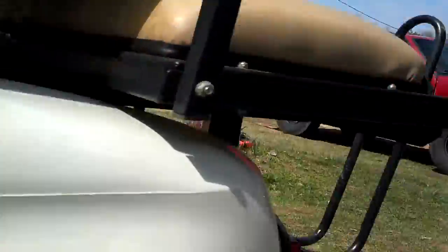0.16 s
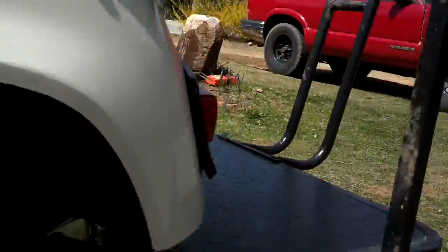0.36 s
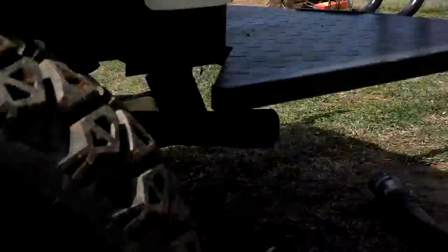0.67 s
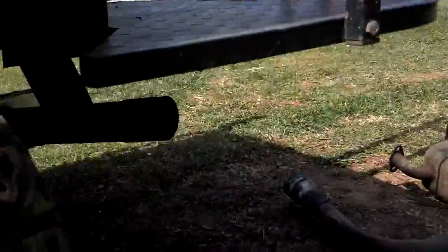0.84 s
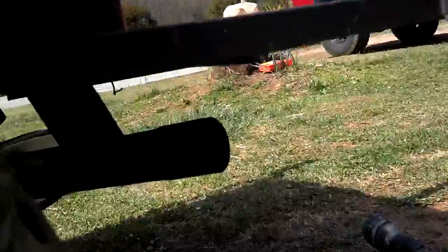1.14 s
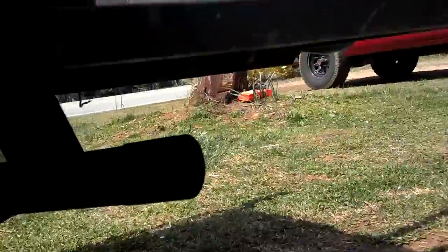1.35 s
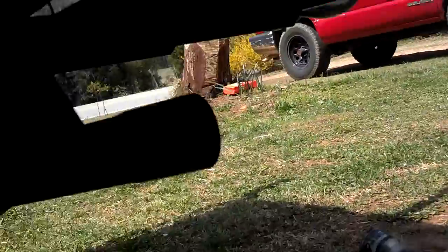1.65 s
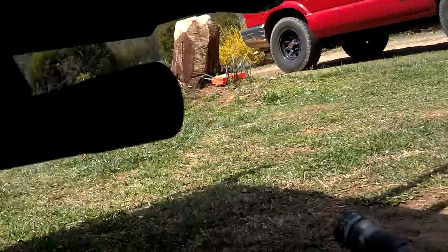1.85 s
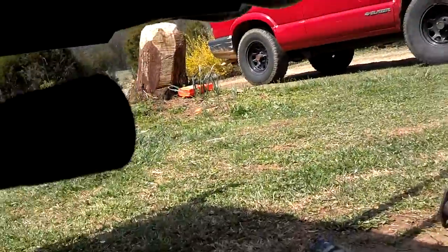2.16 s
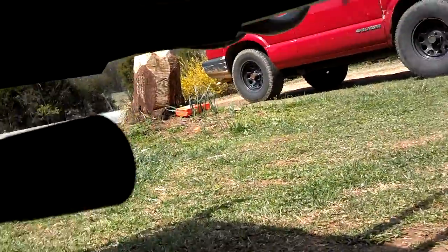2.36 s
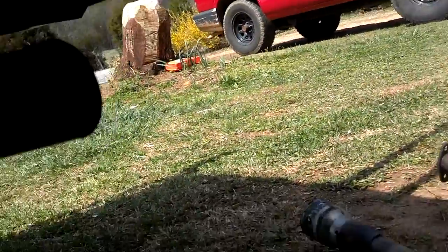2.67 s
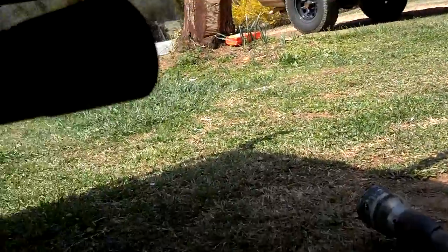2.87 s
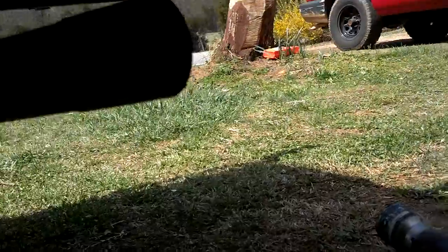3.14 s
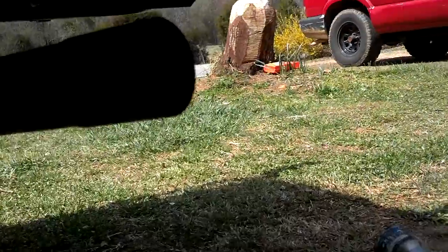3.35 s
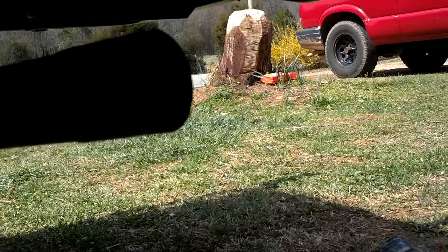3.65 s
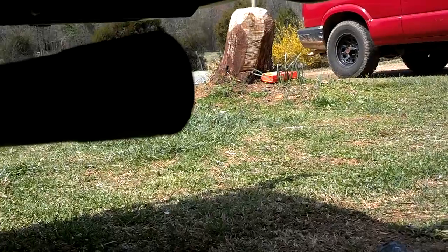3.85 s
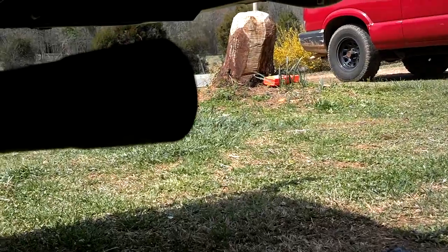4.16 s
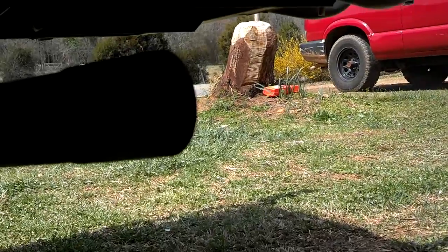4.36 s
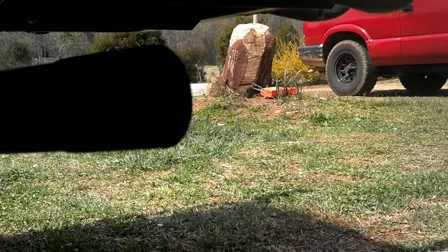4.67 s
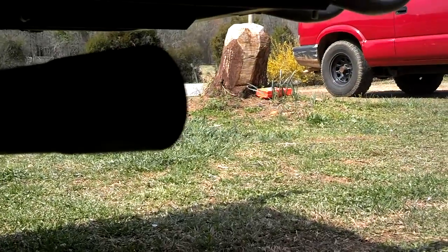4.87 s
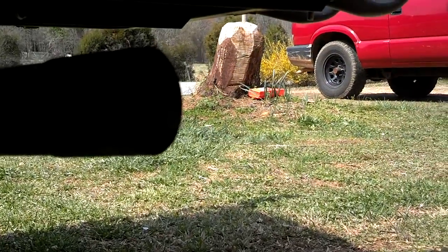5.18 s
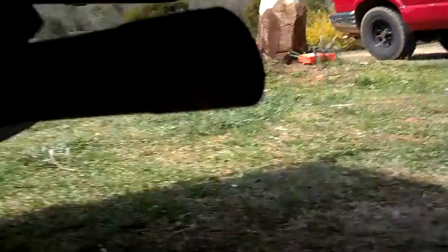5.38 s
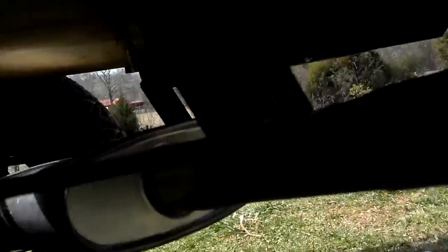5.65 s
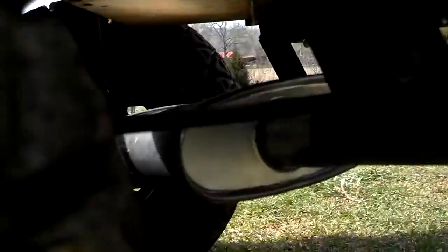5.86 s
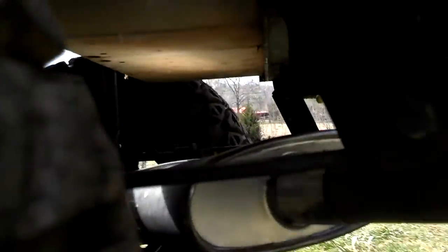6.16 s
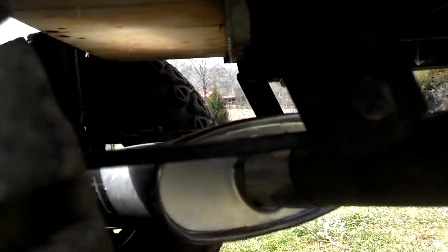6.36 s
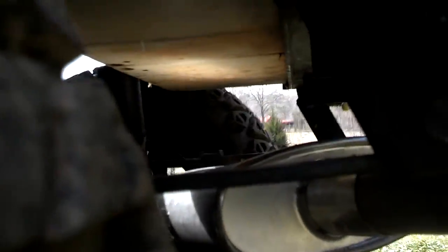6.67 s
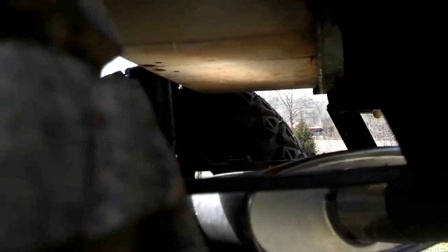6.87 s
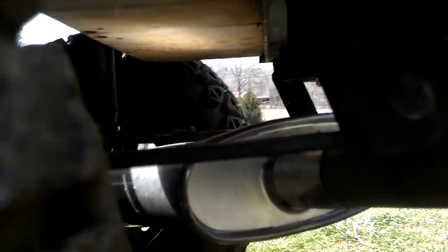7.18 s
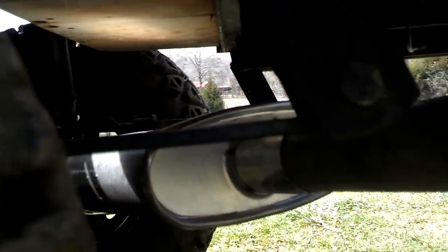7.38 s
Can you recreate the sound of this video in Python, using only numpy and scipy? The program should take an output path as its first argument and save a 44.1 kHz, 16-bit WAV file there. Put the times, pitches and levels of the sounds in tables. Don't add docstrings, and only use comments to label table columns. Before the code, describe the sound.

A small two-cylinder petrol engine idles in lumpy, uneven pops through an open exhaust outdoors, then is revved three times with raspy barks and burbling coast-downs.

```python
import sys
import numpy as np
from scipy import signal
from scipy.fft import rfft, irfft, next_fast_len
from scipy.io import wavfile
from scipy.ndimage import uniform_filter1d

SR = 44100
rng = np.random.default_rng(int(sys.argv[2]) if len(sys.argv) > 2 else 0)


def output_pcm(signal):
    pcm = np.clip(np.atleast_2d(signal).T, -1, 1) * 32767
    wavfile.write(sys.argv[1], SR, np.round(pcm).astype(np.int16))


def magnitude_from_level(level_db):
    exponent = np.asarray(level_db, float) / 20
    return 10 ** exponent


N = 331632
TIME_S = np.arange(N) / SR

# start in seconds, end in seconds.
THROTTLE_OPEN = [
    (2.875, 3.465),
    (4.08, 4.71),
    (6.291, 6.955),
]
# start in seconds, end in seconds.
AFTERBURN = [
    (4.71, 5.5),
    (6.955, 7.6),
]
MISFIRES = [114]
# time in seconds, speed in cycles per second.
SPEED = [(2.375, 15.06), (2.89, 11.86), (3.19, 20.95), (3.46, 26.37), (4.08, 20.25), (4.55, 33.19),
         (4.69, 36.2), (5.21, 28.83), (5.64, 24.09), (6.3, 18.51), (6.76, 29.76), (6.93, 31.83),
         (7.625, 26.17)]
# start in seconds, first effort in dB, last effort in dB, thump in dB, hiss over effort in dB.
STAGES = [
    (2.43, -34.5, -28, -24, -6),
    (2.875, -23, -15, -20.5, -4),
    (3.49, -25.5, -23.5, -18, -5),
    (4.08, -14.5, -12, -17.5, -8),
    (4.71, -16.5, -21, -16, -2),
    (5.51, -22, -22.5, -17.5, -7),
    (6.291, -17.5, -16.5, -18.5, -7),
    (6.97, -21, -22.5, -18.5, -3.5),
]
# time
# in seconds, strength in dB, thump in dB, sharpness from 0 to 1.
CAUGHT = [(0.0, -16, -47, .2), (0.037, -15.5, -54, 0.48), (0.089, -15.5, -41, 0.5),
          (0.317, -16, -38.5, 0.45), (0.43, -18, -40, 0.56), (0.496, -11.5, -44, 0.49),
          (0.771, -14.5, -40, 0.45), (0.834, -16.5, -41, 0.48), (0.999, -10, -40, 0.4),
          (1.06, -11.5, -46, 0.45), (1.115, -16, -36, .59), (1.171, -12.5, -41, 0.39),
          (1.417, -13.5, -42, 0.51), (1.472, -12.5, -35, 0.56), (1.53, -16.5, -41, 0.41),
          (1.661, -15, -41, 0.38), (1.725, -15.5, -39.5, 0.7), (1.838, -16, -38, 0.51),
          (1.894, -16.5, -39, 0.48), (2.008, -21.5, -34, 0.82), (2.069, -11, -35, 0.62),
          (2.15, -13, -32, 0.65), (2.191, -11.5, -33, 0.61), (2.248, -10.5, -30, 0.56),
          (2.281, -9.5, -48, .61), (2.33, -20, -31, 0.79), (2.357, -9, -29.5, 0.5),
          (2.398, -10.5, -34, 0.55)]
# frequency in Hz, width in Hz, level in dB.
PIPE = [(514, 96, 3.5), (418, 710, -7), (824, 70, 3), (1070, 274, 2), (1258, 42, -3.5), (1853, 33, -8)]
# delay in seconds, level in dB.
PIPE_ECHOES = [(.0032, -6), (.0118, -6), (.019, -13)]
# frequency in Hz, width in Hz, level in dB.
MOUTH = [(980, 600, 0)]
# frequency in Hz, width in Hz, level in dB.
TAIL_RING = [(859, 73.3, 2), (1265, 74, -4)]
# frequency in Hz, width in Hz, level in dB.
BOX = [(92, 37, -1), (139, 69, -2), (220, 52, -2), (315, 320, -12.5)]
# frequency in Hz, width in Hz, level in dB.
IDLE_BOX = [(86, 9, 15), (133, 40, 5), (187, 340, -6)]
# multiple of the cycle rate, level in dB.
OVERRUN_ORDERS = [(1, -43), (2, -2), (3, 9), (4, 4.5), (5, -1), (6, 4), (7, -8), (8, -10), (9, -15),
                  (10, -8.5), (11, -10), (12, -15), (13, -28), (14, -8.5), (15, -20), (16, -8), (17, -33),
                  (18, -17)]
# phase in cycles, level in dB.
VALVE_SLAPS = [(.57, -14), (.69, -7), (.745, -8), (.83, -6), (.95, -11), (.13, -15)]
# frequency in Hz, width in Hz, level in dB.
TAPPETS = [(5990, 230, -7.5), (10960, 150, 3.5)]
# frequency in Hz, width in Hz, level in dB.
CASING = [(2230, 1170, -2), (3590, 560, -0.5), (12400, 5400, -12)]
# frequency in Hz, level in dB per Hz.
JET = [(1200, 11), (2000, 1.5), (2600, -17), (3800, 3.4), (5500, -0.5), (10000, -2.5), (13000, -7),
       (16500, 1)]
# frequency in Hz, level in dB per Hz.
RUMBLE = [(40, -25), (80, -4), (150, -6), (300, -14), (600, -18.5), (1000, -19.5), (2000, -39.5),
          (5000, -39.5), (16000, -45)]
# time in seconds, lag of the far port in samples, far port level in dB.
PORTS = [(0, 10, 4), (3, 7, -4.5), (5.2, 10, -4), (5.7, 5.5, -6), (6.2, 3.5, -2), (6.5, 4.5, 3.5),
         (7.52, -2.4, 4)]

FIRST_CYCLE = 20.53
SECOND_CYLINDER_CYCLES = .37
IDLE_GAP_S = .058
WEAK_DB, WEAK_GAIN_DB_PER_S, WEAK_THUMP_DB, WEAK_SHARPNESS = -22, 3, -51.5, 0.5
IDLE_HISS_DB, HISS_FOLLOWS, HISS_DB_PER_SHARPNESS = -34.5, 0.7, 15.5
STAGE_CHANGE_S = 0.036
GULP_DB, GULP_S = -13, 0.02
HISS_DB_PER_OCTAVE = 0.5
PUFF_DEPTH, PUFF_DEPTH_PER_HZ, SMOOTH_ABOVE_HZ = 0.32, 0.098, 35.6
THUMP_PHASE_CYCLES, THUMP_GAP_CYCLES = 0.4387, .32
RING_DB, RING_PHASE_CYCLES = 41, .67
CRACK_DB, CRACK_DB_PER_OCTAVE, LOAD_FLOW_DB = 42, -7, -5
BURN_POP_DB, BURN_JET_DELAY_CYCLES, BURN_FLOW_DB = 3.5, .17, -7
BEAM_LAG_SAMPLES = 16


def even(x):
    return x / np.sqrt(uniform_filter1d(x ** 2, size=SR // 5) + 1e-12)


def clicks(at_s, gain):
    index = np.clip((at_s * SR).astype(int), 0, N - 1)
    return np.bincount(index, gain, N) + 1e-18


def swell(x, rise_s):
    r = np.exp(-1 / (rise_s * SR))
    return signal.lfilter([np.e * (1 - r)], [1, -2 * r, r * r], x)


def resonances(x, modes):
    out = 0
    for k, (hz, width_hz, db) in enumerate(modes):
        r = np.exp(-np.pi * width_hz / SR)
        gain = (-1) ** k * magnitude_from_level(db) * (1 - r * r) / 2
        poles = [1, -2 * r * np.cos(2 * np.pi * hz / SR), r * r]
        out = out + signal.lfilter([gain, 0, -gain], poles, x)
    return out


def port_noise(alike):
    shared = rng.standard_normal(N)
    own = rng.standard_normal((2, N))
    return np.sqrt(alike) * shared + np.sqrt(1 - alike) * own


def coloured(x, spectrum):
    hz, db = np.transpose(spectrum)
    size = next_fast_len(N)
    bin_hz = np.arange(size // 2 + 1) * SR / size
    gain = magnitude_from_level(np.interp(np.log(bin_hz + 1), np.log(hz), db))
    out = irfft(rfft(x, size) * gain, size)[..., :N]
    return out / out.std()


def during(spans):
    inside = sum((TIME_S > a) & (TIME_S < b) for a, b in spans)
    return uniform_filter1d(inside * 1., size=200)


def crank():
    s, hz = np.transpose(SPEED)
    speed_hz = np.interp(TIME_S, s, hz)
    return speed_hz, FIRST_CYCLE + np.cumsum(speed_hz * (TIME_S > s[0])) / SR


def passes(turned, phase, spread_db):
    cycles = np.arange(np.ceil(turned[0]), turned[-1] - phase) + phase
    gain = magnitude_from_level(spread_db * rng.standard_normal(len(cycles)))
    gain[np.isin(np.round(cycles, 1), MISFIRES)] *= .4
    return clicks(np.interp(cycles, turned, TIME_S), gain)


def puff(turned, phase, depth):
    angle = 2 * np.pi * (turned - phase)
    return even(np.exp(depth * np.cos(angle + 0.87 * np.cos(angle))))


def idle_firings():
    caught = np.array(CAUGHT)
    gaps = zip(caught[:, 0], caught[1:, 0])
    weak_s = np.concatenate([np.linspace(a, b, round((b - a) / IDLE_GAP_S), False)[1:] for a, b in gaps])
    chance = rng.standard_normal((len(weak_s), 3)) * [2, 3, .1]
    usual = np.transpose([WEAK_DB + WEAK_GAIN_DB_PER_S * weak_s,
                          WEAK_THUMP_DB + 0 * weak_s, WEAK_SHARPNESS + 0 * weak_s])
    at_s, bark_db, thump_db, sharp = np.vstack([caught, np.c_[weak_s, usual + chance]]).T
    hiss_db = IDLE_HISS_DB + HISS_FOLLOWS * bark_db + HISS_DB_PER_SHARPNESS * sharp
    sharp = np.clip(sharp, 0, 1)
    start_s = at_s + .003 - .012 * (1 - sharp)
    return at_s, start_s, bark_db, thump_db, hiss_db, sharp


def stages(speed_hz, load, burn):
    start_s, first_db, last_db, thump_db, hiss_db = np.transpose(STAGES)
    end_s = np.append(start_s[1:], N / SR) - STAGE_CHANGE_S
    knots_s = np.ravel([start_s, end_s], "F")
    effort_db, thump_db, hiss_db = [np.interp(TIME_S, knots_s, np.ravel(ends, "F"))
                                    for ends in ([first_db, last_db], [thump_db] * 2, [hiss_db] * 2)]
    gulp_db = GULP_DB * sum(np.interp(TIME_S, [a - GULP_S, a - .003, a], [0, 1, 0]) for a, _ in THROTTLE_OPEN)
    bark_db = effort_db + gulp_db
    hiss_db = hiss_db + bark_db + load * HISS_DB_PER_OCTAVE * np.log2(speed_hz / speed_hz.mean())
    burning = np.minimum(load + burn, 1)
    depth = PUFF_DEPTH + burning * PUFF_DEPTH_PER_HZ * np.maximum(SMOOTH_ABOVE_HZ - speed_hz, 0)
    return thump_db, bark_db, hiss_db, depth


def body_rumble(load, running, thump):
    effort = magnitude_from_level(-12 + 4 * load) * thump + (1 - running) * magnitude_from_level(-37.5)
    return effort * coloured(port_noise(.94), RUMBLE)


def valve_gear(idle, hiss):
    at_s = idle[0]
    taps_s = np.concatenate([at_s - .011, at_s + 0.051])
    uneven_db = 4 * rng.standard_normal(len(taps_s))
    ticks = swell(clicks(taps_s, magnitude_from_level(-29.0 + uneven_db)), 0.011) + magnitude_from_level(-16.0) * hiss
    return resonances(ticks * port_noise(0.47), TAPPETS)


def jet_flow(idle, turned, fire, load, burn, hiss, depth):
    at_s, start_s, _, _, idle_hiss_db, sharp = idle
    blown = even(swell(fire, 0.0074) + 0.52 * np.exp(-depth))
    puffed = puff(turned, 0.78 + BURN_JET_DELAY_CYCLES * burn, depth)
    jet = hiss * (load * blown + (1 - load) * puffed)
    jet += hiss * load * magnitude_from_level(0.5) * swell(fire, 0.001)
    soft = swell(clicks(start_s + 0.0015, magnitude_from_level(idle_hiss_db - 1.5)), 0.0045)
    jet += uniform_filter1d(soft, size=300)
    jet += swell(clicks(at_s + 0.0042, sharp ** 2 * magnitude_from_level(idle_hiss_db + 18.5)), 0.0042)
    return jet + magnitude_from_level(-60)


def jet_hiss(jet):
    hiss = jet * coloured(port_noise(0.052), JET)
    return hiss + resonances((magnitude_from_level(-35) + magnitude_from_level(0.0) * jet) * port_noise(0.063), CASING)


def coasting_note(turned):
    angle = 2 * np.pi * (turned - THUMP_PHASE_CYCLES)
    note = 0
    for k, db in OVERRUN_ORDERS:
        sign = np.sign(np.cos(np.pi * k * THUMP_GAP_CYCLES))
        note = note - magnitude_from_level(db) / k ** .3 * sign * np.sin(k * angle)
    return even(signal.sosfilt(signal.butter(4, 62, "high", fs=SR, output="sos"), note))


def pressure_thump(idle, turned, fire, load, slow_boost, thump):
    at_s, _, _, idle_thump_db, _, _ = idle
    late = np.roll(fire, round(0.00712 * SR))
    pressure = thump * load * slow_boost * magnitude_from_level(4) * even(resonances(swell(late, .0009), BOX))
    pressure += thump * (1 - load) * magnitude_from_level(2.5) * coasting_note(turned)
    idle_push = swell(clicks(at_s + 0.00852, magnitude_from_level(idle_thump_db + 27.0)), 0.0013)
    return pressure + resonances(idle_push, IDLE_BOX)


def tailpipe_ring(turned, load, burn, bark):
    pops = bark * (1 - load) * magnitude_from_level(RING_DB + BURN_POP_DB * burn) * passes(turned, RING_PHASE_CYCLES, 1.0)
    return resonances(resonances(pops, TAIL_RING), TAIL_RING)


def rough_flow(idle, turned, fire, load, burn, bark, depth):
    _, start_s, idle_bark_db, _, _, sharp = idle
    loaded = even(swell(fire, 0.0039) + 1.2) * magnitude_from_level(LOAD_FLOW_DB)
    coasting = magnitude_from_level(BURN_FLOW_DB * burn - 4) * puff(turned, 0.64, 0.6 * depth)
    flow = bark * (load * loaded + (1 - load) * coasting)
    slow = swell(clicks(start_s, (1 - 1.47 * sharp) * magnitude_from_level(idle_bark_db - 6.5)), 0.02)
    flow += uniform_filter1d(slow, size=400)
    return magnitude_from_level(8) * flow * port_noise(.6)


def exhaust_cracks(idle, turned, fire, load, burn, bark, slow_boost):
    at_s, _, idle_bark_db, _, _, sharp = idle
    slaps = sum(magnitude_from_level(db) * passes(turned, phase, 0.61) for phase, db in VALVE_SLAPS)
    coasting = magnitude_from_level(-1.0 - 2.3 * burn) * slaps
    cracks = bark * magnitude_from_level(CRACK_DB) * (load * slow_boost * fire + (1 - load) * coasting)
    cracks += clicks(at_s, sharp ** 2 * magnitude_from_level(idle_bark_db + 42))
    echoes = sum(magnitude_from_level(db) * np.roll(cracks, round(s * SR)) for s, db in PIPE_ECHOES)
    return signal.lfilter([.3], [1, -.7], cracks + echoes)


def pipe_bark(cracks, rough):
    return -resonances(cracks + rough, PIPE) - resonances(cracks, MOUTH)


def engine():
    speed_hz, turned = crank()
    load, burn = during(THROTTLE_OPEN), during(AFTERBURN)
    thump_db, bark_db, hiss_db, depth = stages(speed_hz, load, burn)
    running = np.interp(TIME_S, [2.41, 2.44], [0, 1])
    thump, bark, hiss = running * magnitude_from_level([thump_db, bark_db, hiss_db])
    fire = passes(turned, -.03, .7) + passes(turned, SECOND_CYLINDER_CYCLES - .04, .7)
    slow_boost = magnitude_from_level(CRACK_DB_PER_OCTAVE * np.log2(speed_hz / speed_hz.mean()))
    idle = idle_firings()

    out = body_rumble(load, running, thump) + valve_gear(idle, hiss)
    out += jet_hiss(jet_flow(idle, turned, fire, load, burn, hiss, depth))
    out += pressure_thump(idle, turned, fire, load, slow_boost, thump)
    out += tailpipe_ring(turned, load, burn, bark)
    cracks = exhaust_cracks(idle, turned, fire, load, burn, bark, slow_boost)
    rough = rough_flow(idle, turned, fire, load, burn, bark, depth)
    return out + magnitude_from_level(-2) * pipe_bark(cracks, rough)


def scene():
    near, far = engine()
    s, lag_samples, far_db = np.transpose(PORTS)
    far = np.interp(np.arange(N) - np.interp(TIME_S, s, lag_samples), np.arange(N), far)
    return np.array([near, far * magnitude_from_level(np.interp(TIME_S, s, far_db))])


def low_pass(x):
    return signal.sosfilt(signal.butter(12, 16820, fs=SR, output="sos"), x)


def record(dry):
    ports = 1.456 * np.tanh(dry / 1.534)
    beams = ports - np.roll(ports[::-1], BEAM_LAG_SAMPLES, axis=1)
    beams = signal.sosfilt(signal.butter(2, 65, "high", fs=SR, output="sos"), beams)
    beams = signal.sosfilt(signal.cheby2(12, 60, 16500, fs=SR, output="sos"), beams)
    return low_pass(np.clip(beams, -.95, .95))


dry = scene()
out = record(dry)
output_pcm(out)
```